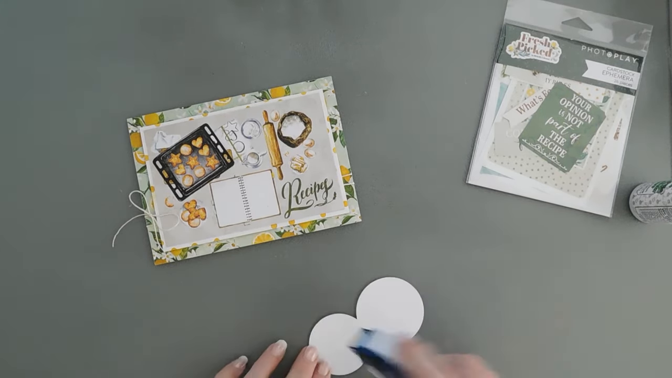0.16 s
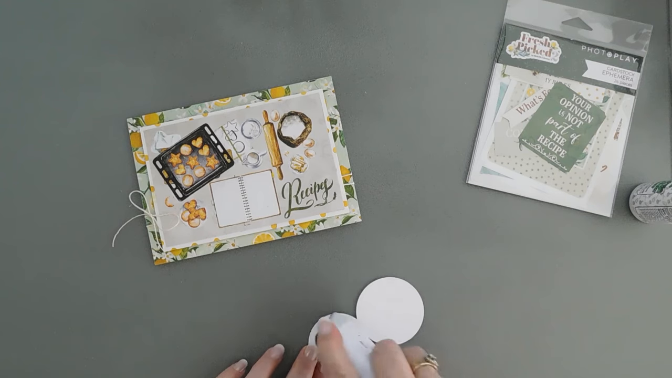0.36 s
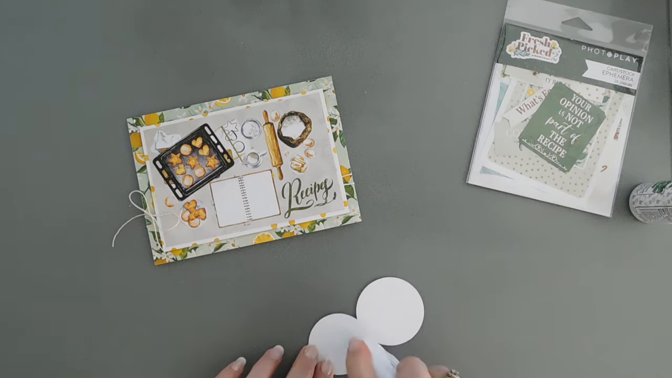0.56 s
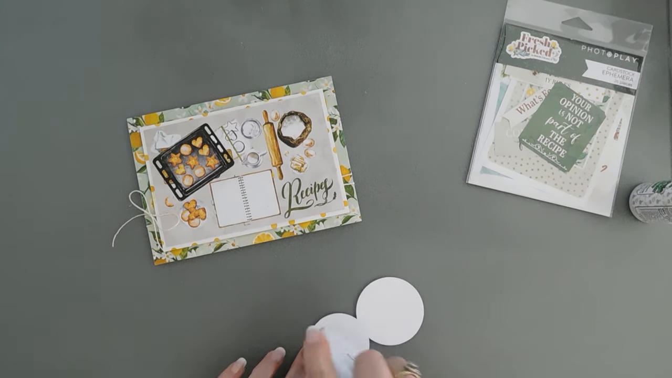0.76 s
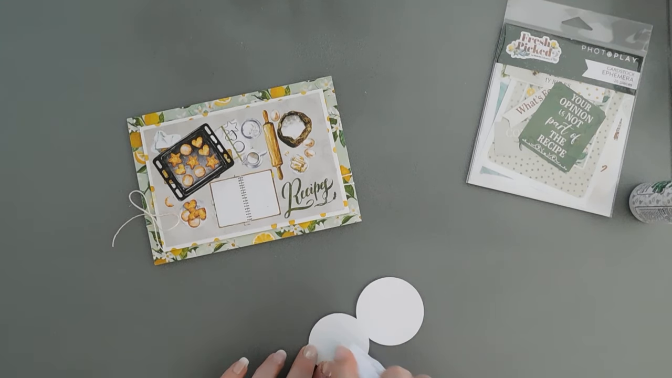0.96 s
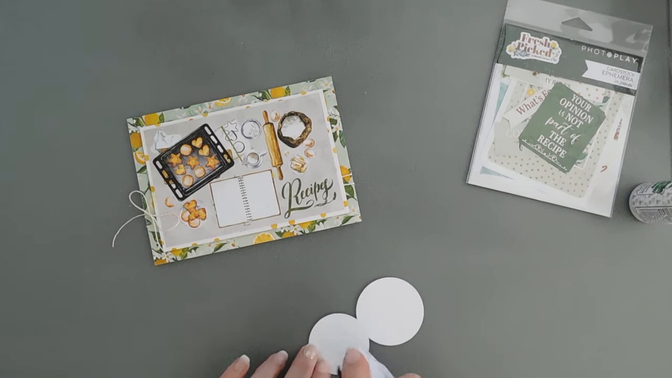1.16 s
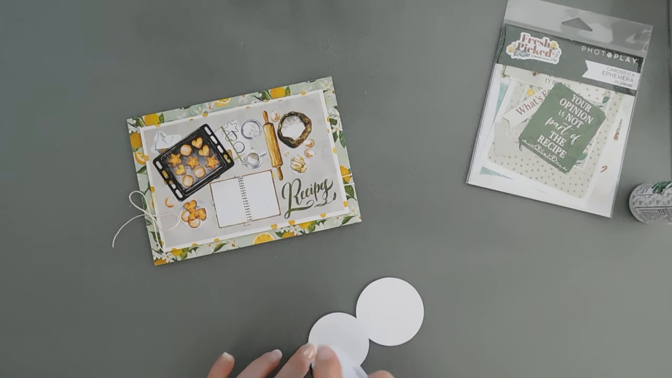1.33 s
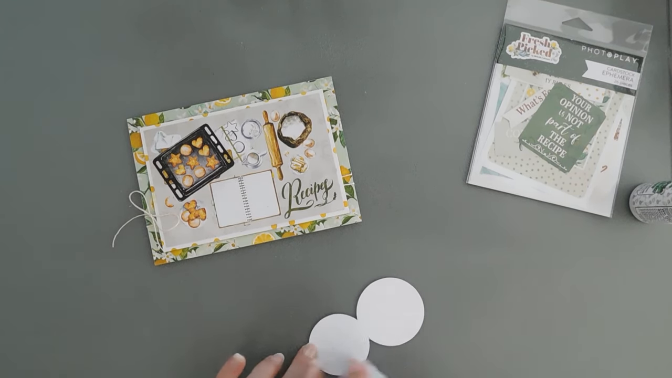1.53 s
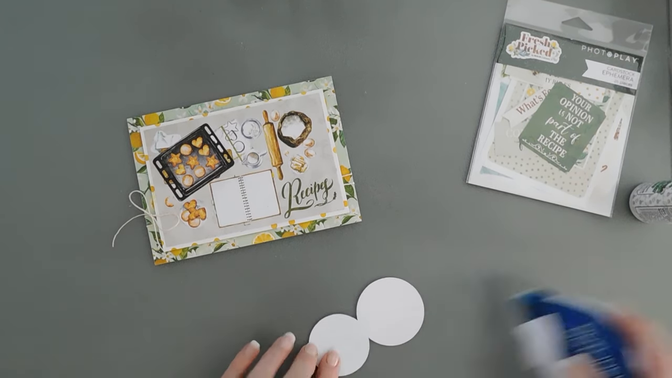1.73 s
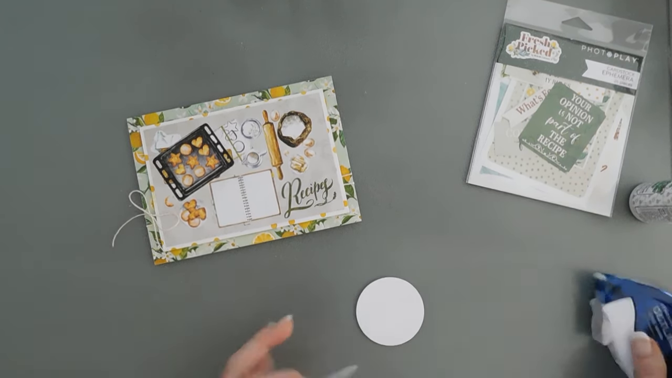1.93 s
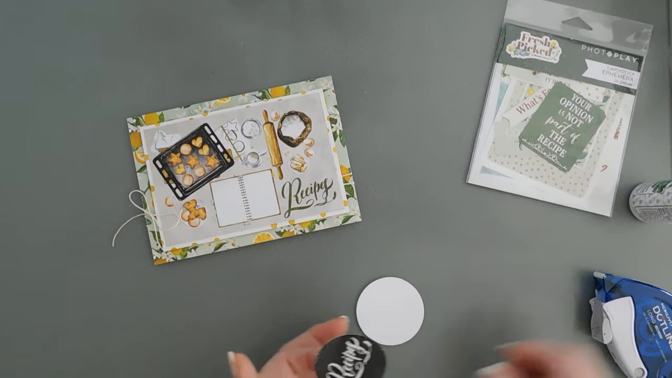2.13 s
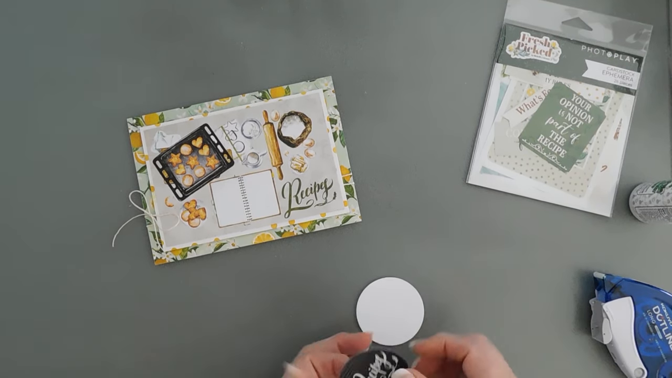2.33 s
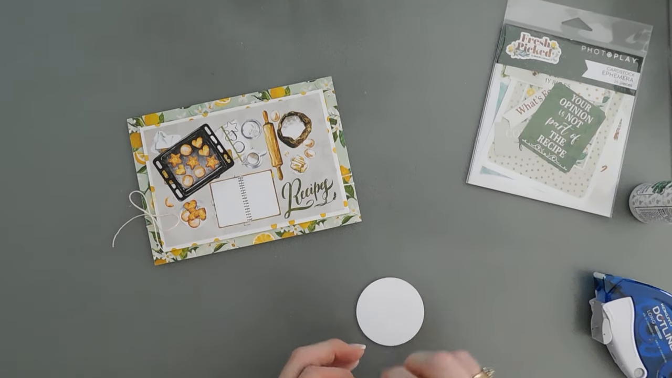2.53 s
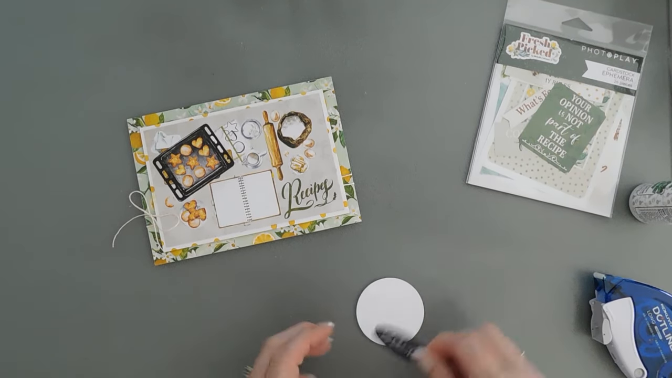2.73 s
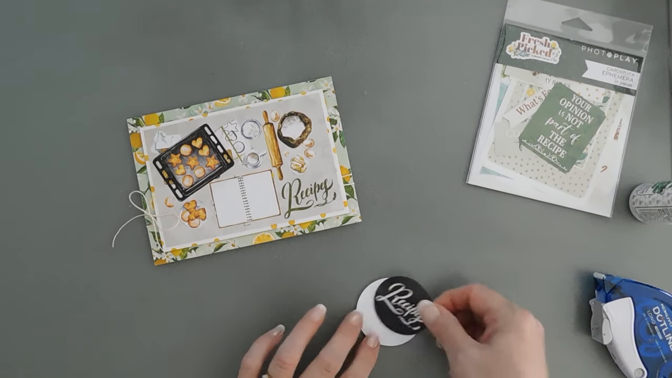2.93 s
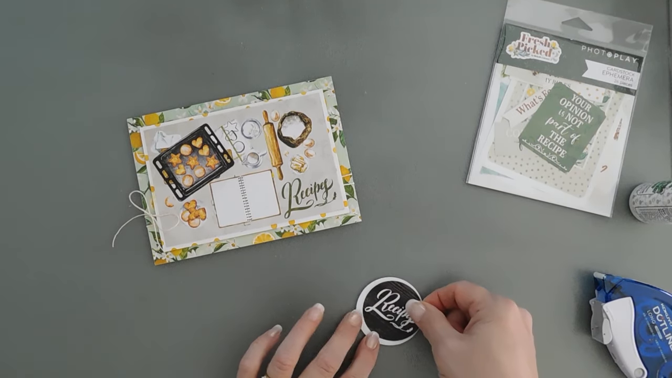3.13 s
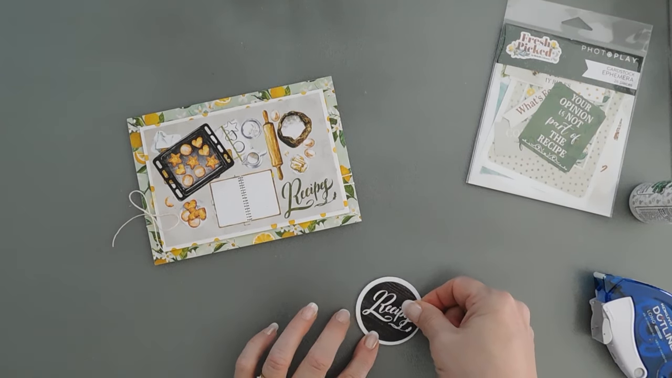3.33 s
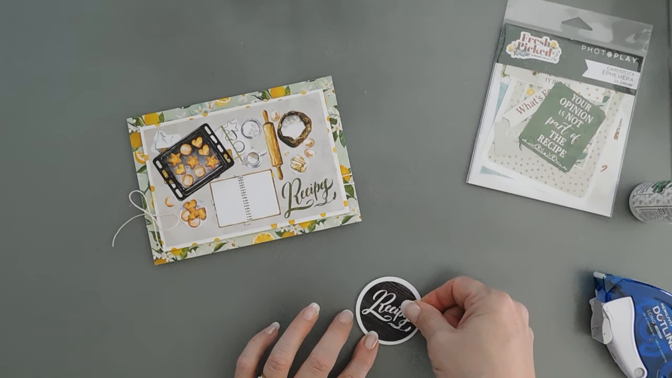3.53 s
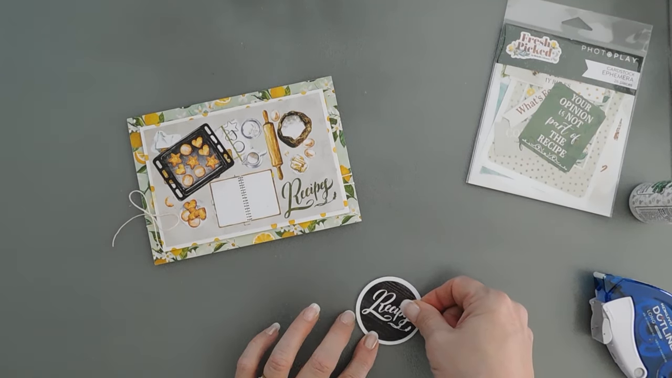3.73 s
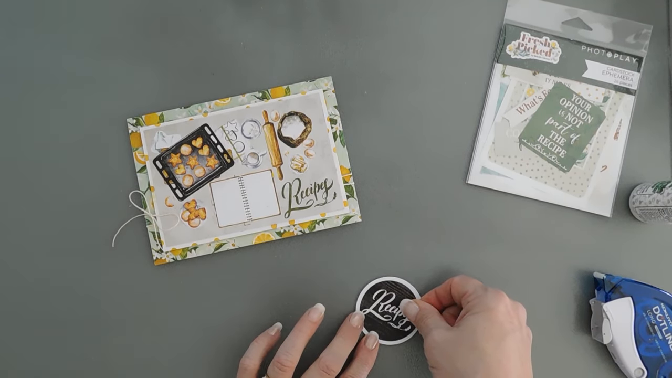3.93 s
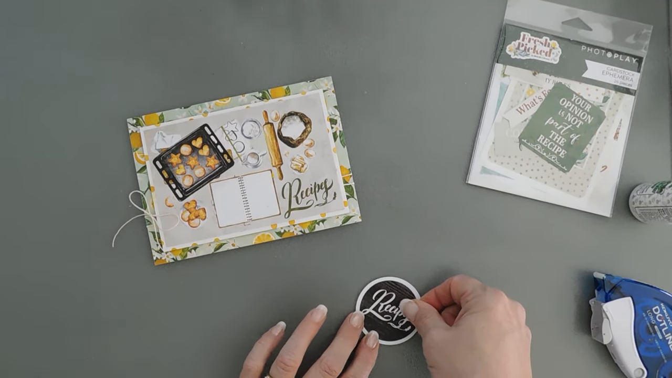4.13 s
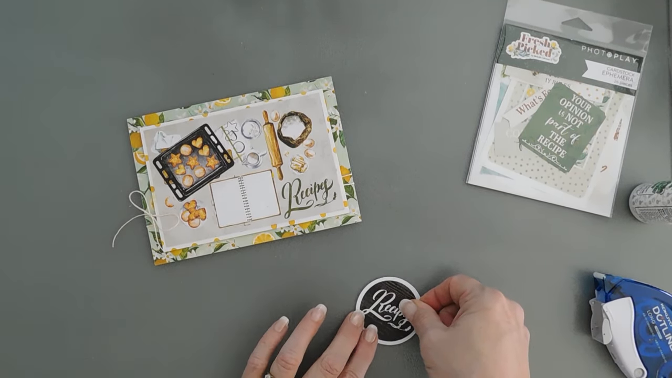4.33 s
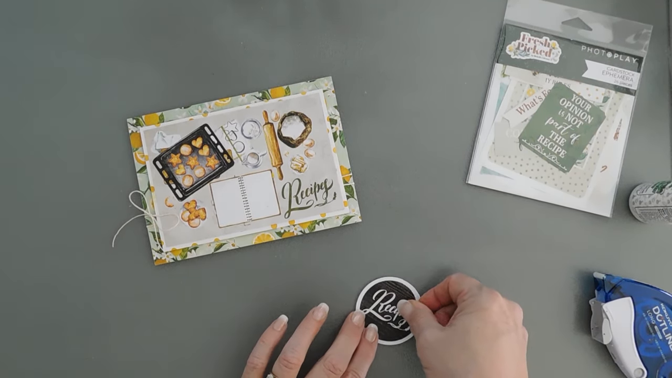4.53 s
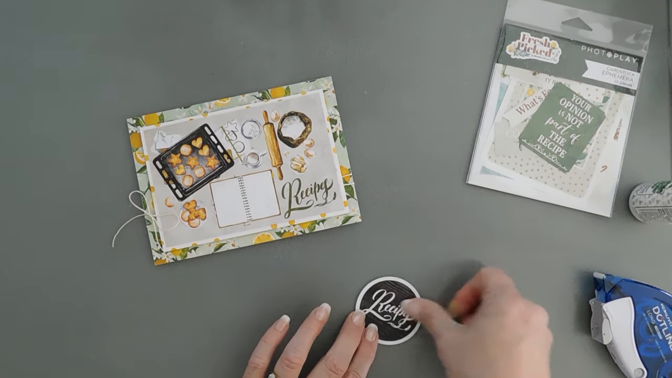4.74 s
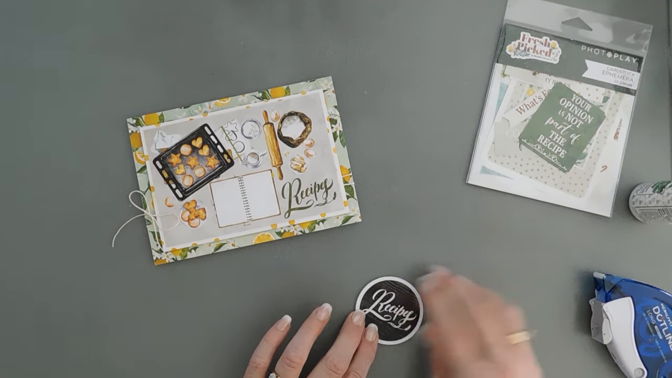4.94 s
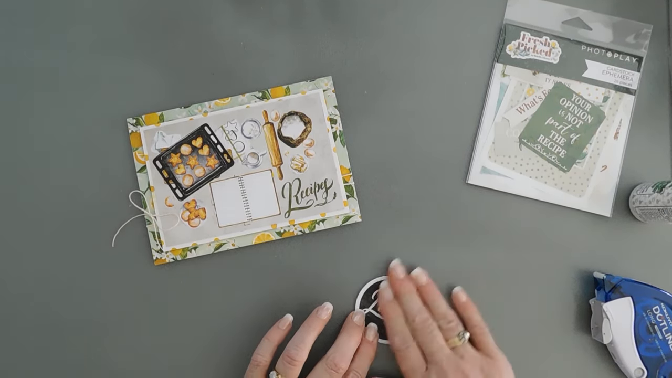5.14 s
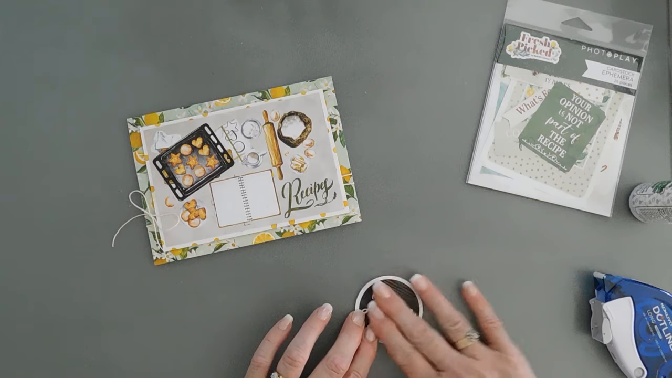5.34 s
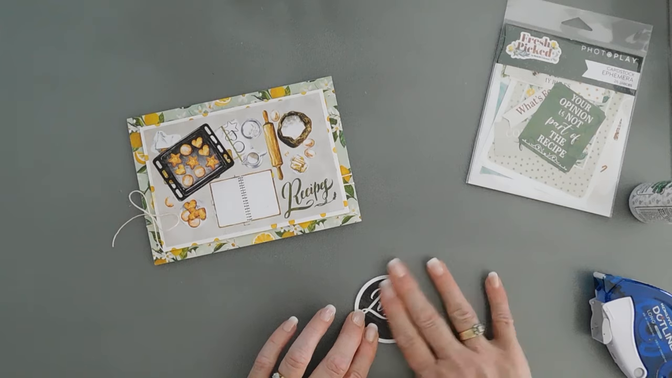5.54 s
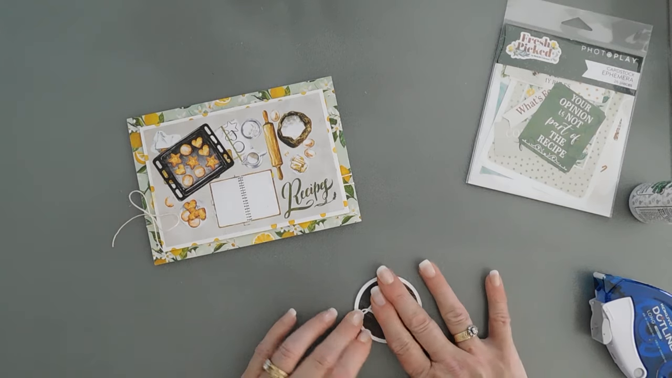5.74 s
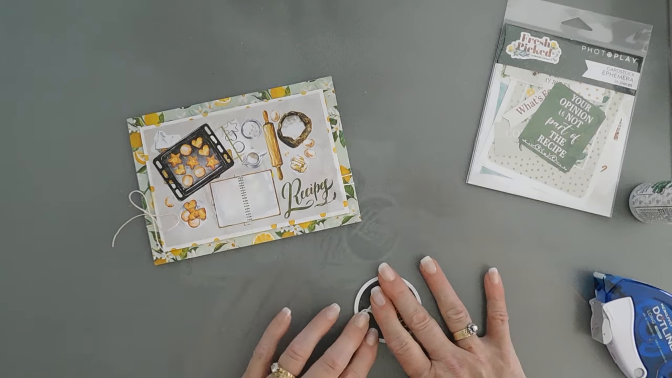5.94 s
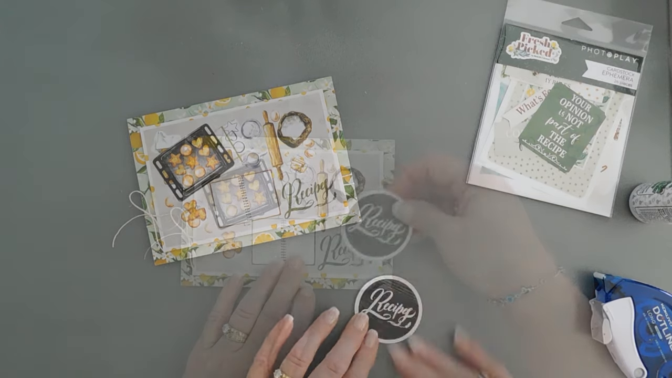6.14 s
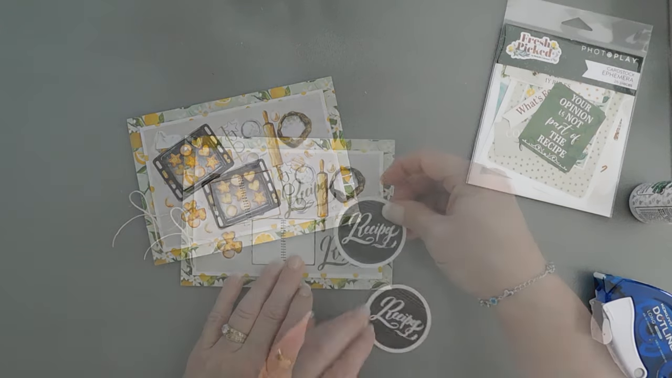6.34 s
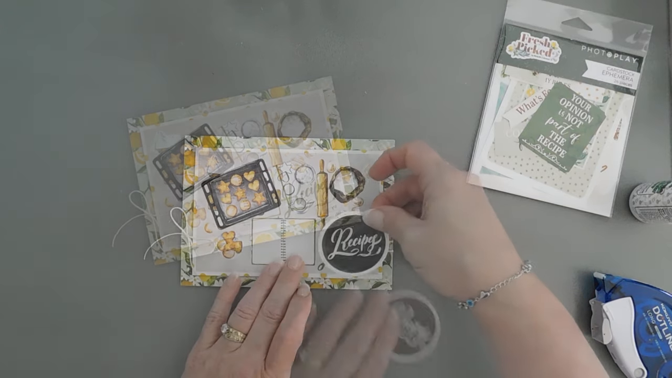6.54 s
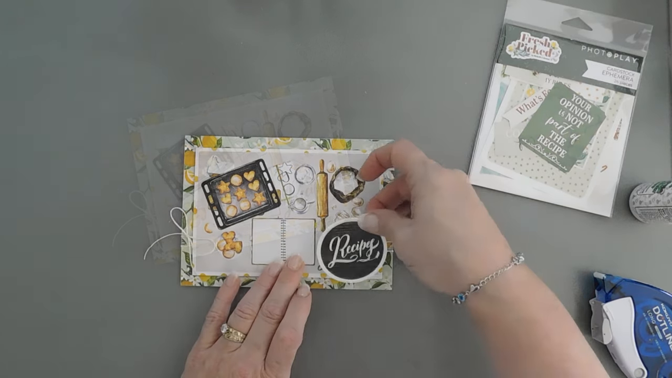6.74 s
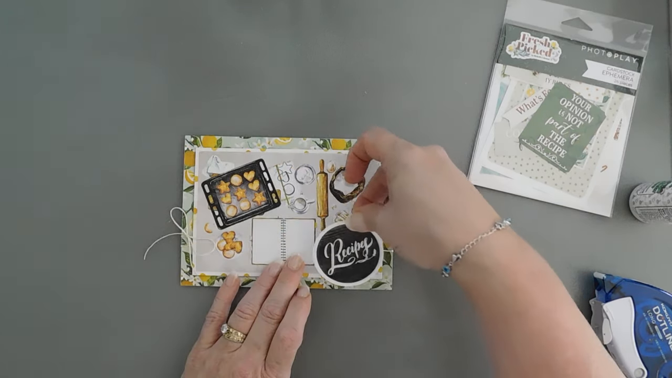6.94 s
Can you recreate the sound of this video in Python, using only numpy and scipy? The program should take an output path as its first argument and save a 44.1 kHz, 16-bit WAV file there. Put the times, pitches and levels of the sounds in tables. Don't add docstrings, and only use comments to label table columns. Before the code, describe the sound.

A plastic tape runner clacks and rattles through three short zipping pulls, drops noisily onto a table, then fingers softly tap and rub card.

```python
import sys
import numpy as np
from scipy import signal
from scipy.io import wavfile
from scipy.ndimage import uniform_filter1d

SR = 44100
rng = np.random.default_rng(int(sys.argv[2]) if len(sys.argv) > 2 else 0)


def unload_audio(sound):
    columns = np.transpose(np.atleast_2d(sound))
    steps = np.round(np.clip(columns, -1, 1) * 32767)
    wavfile.write(sys.argv[1], SR, steps.astype(np.int16))


def makeup_ratio(level_db):
    decades = np.asarray(level_db, float) / 20
    return 10 ** decades


N = 312777
STEP = 32

# (f/Hz, width/Hz, level/dB)
CARD_MODES = [(600, 200, -6), (850, 220, -5), (1150, 260, -3), (1500, 220, 0), (1950, 320, -2),
              (2450, 380, 0), (2900, 400, -2), (3400, 400, -1), (3850, 450, 0), (4350, 500, -1),
              (5500, 700, -4)]
# (f/Hz, density/dB)
TAPE_HISS = [(2350, -56.5), (4000, -0.5), (4520, -17.5), (4870, -14.5), (6550, -10), (14800, -10.5),
             (16000, -10)]


def runner():
    # (f/Hz, width/Hz, level/dB)
    case_modes = [(932, 68, -2), (1100, 80, -2), (1190, 110, 0.5), (1500, 230, -3.5), (1700, 140, -5.5),
                  (1960, 170, -3.5), (2420, 400, 4.5), (2660, 470, 5.5), (3119, 570, 8.5), (3450, 370, 6.5),
                  (4200, 560, 0.5), (6000, 570, 0.5)]
    # (t/s, peak/dB, centre f/Hz, crack re peak/dB, chatter/ms)
    landings = [(0.412, -21, 2030, -27.5, 3.6), (0.414, -31, 1030, -39, 4.9),
                (0.421, -23.5, 1100, -30, 1.7), (0.853, -22.5, 2540, -21.5, 5.6),
                (0.8605, -17.5, 1100, -17, 3.9), (0.8635, -16.5, 3450, -19.5, 3.5),
                (0.8695, -17.5, 2400, -23, 3.2), (0.878, -25, 2500, -29.5, 2.7),
                (0.878, -28.5, 1120, -21.5, 6.6), (1.46, -19.5, 1200, -20.5, 4.4),
                (1.461, -20.5, 2700, -14, 4.1), (1.469, -15, 2400, -35, 4.9),
                (1.468, -23.5, 1150, -30, 5.6), (1.479, -20.5, 2180, -28, 4.6)]
    # (t/s, peak/dB, centre f/Hz, crack re peak/dB,
    # chatter/ms)
    rattles = [(0.025, -41, 1700, -34, 3.2), (0.0815, -35.5, 1980, -30, 2.1),
               (0.127, -19.5, 2080, -18, 2.3), (0.197, -44, 3300, -13, 5.3), (0.236, -55, 789, -31, 2.5),
               (0.248, -38.5, 958, -39, 5.4), (0.2805, -41.5, 3450, -31, 0.92),
               (0.447, -54, 2500, -26, 3.2), (0.477, -31, 4400, -24.5, 2.4), (0.48, -23.5, 2100, -25, 16),
               (0.5045, -31, 2580, -14, 4), (0.5175, -19, 3270, -12.5, 8.1), (0.519, -22.5, 2250, -18.5, 9),
               (0.561, -35.5, 1800, -23, 3.0), (0.574, -24, 3020, -17, 1.3),
               (0.647, -26.5, 3260, -14.5, 3.1), (0.652, -21.5, 1700, -31.5, 2.7),
               (0.702, -44.5, 1650, -10, 3.8), (0.9095, -17, 2020, -19, 2.3), (0.911, -22, 2830, -16, 1.24),
               (0.925, -35, 3050, -26, 5), (0.933, -36, 2950, -28, 1.3), (0.951, -28.5, 3000, -21, 2.1),
               (1.13, -37, 3940, -10.5, 2), (1.173, -29.5, 2870, -43, 3.1),
               (1.506, -21.5, 1150, -30.5, 3.0), (1.503, -25, 3100, -26, 5),
               (1.526, -20.5, 3380, -15.5, 8.3), (1.691, -38.5, 3320, -8.5, 2.9),
               (1.695, -42, 2140, -8.5, 1.9),
               (0.068, -49, 2500, -4.5, 1.5),
        (1.149, -50, 3600, -4.5, 2.5),
        (1.807, -50.5, 1920, -6.5, 2.0),
    ]
    # (t/s, peak/dB, pitch f/Hz, swell/ms)
    tip_pings = [(0.4145, -26.5, 2060, 1.04), (0.4205, -30, 2380, 0.72), (0.434, -36, 2400, 1.1),
                 (0.448, -40, 2400, 0.9), (0.4768, -26.5, 2880, 0.48), (0.5047, -25.5, 1700, 0.29),
                 (0.8633, -15, 2400, 0.47), (0.8635, -17, 3450, 0.62), (0.8675, -14.5, 2770, 0.51),
                 (0.8748, -23, 2920, 0.53), (0.9108, -14.5, 3005, 0.71), (0.915, -14, 2920, 0.38),
                 (1.463, -13.5, 3000, 0.37), (1.4667, -20, 2890, 0.52), (1.4755, -19, 2630, 1),
                 (1.5078, -25, 1810, 0.45)]
    # (t/s, length/s, body rattle/dB, hiss/dB)
    pulls = [
        (0.508, 0.18, -35, -38),
        (0.905, 0.23, -39, -40),
        (1.495, 0.1, -40.5, -45),
    ]
    # (t/s, length/s, body rattle/dB, hiss/dB)
    shifts = [
        (0.05, 0.08, -55, -66),
        (0.18, 0.14, -59, -66.5),
        (0.815, 0.056, -53.5, -63.5),
        (1.43, 0.067, -51.5, -59.5),
        (1.135, 0.046, -53.5, -60),
        (1.27, 0.12, -68.5, -69.5),
        (1.76, 0.13, -71, -67.5),
        (1.85, 0.12, -46, -52.5),
    ]
    # (t/s, length/s, body rattle/dB, hiss/dB)
    buzzes = [
        (0.001, 0.055, -51.5, -69),
        (0.145, 0.03, -39, -69.5),
        (0.432, 0.12, -43, -60),
        (0.67, 0.064, -71, -74),
        (0.883, 0.025, -51, -46),
        (1.185, 0.14, -57, -68),
        (1.485, 0.018, -34, -67),
        (1.715, 0.029, -59, -76),
    ]
    hits = contacts(landings, -21, 1) + contacts(rattles, -58.5, 0.038)
    struck = knocks(hits, case_modes, reach_oct=0.64, lumps_db=2.0, click=1.0, ring_db=-4.0,
                    crack_db=23.0, thud_db=-6.5, thud_cut_hz=75, crack_hz=5566)
    moves = movements(pulls, rise=0.2, hold=0.3, rise_db=11, fall_db=18, hiss_fall_db=25)
    moves += movements(shifts, rise=0.5, hold=0.15, rise_db=7.3, fall_db=14, hiss_fall_db=12)
    moves += movements(buzzes, rise=0.011, hold=0.021, rise_db=0.1, fall_db=30, hiss_fall_db=18)
    strokes = sliding(moves, 1300, 1.5, case_modes, TAPE_HISS, per_s=1100, spread_db=3.5, widen=0.79,
                      likeness=[(5000, 0.64), (15000, 0.94)])
    return placed(struck + pings(tip_pings) + strokes, -3.5, late_samples=1)


def put_down():
    # (f/Hz, width/Hz, level/dB)
    modes = [(860, 150, -14), (1040, 215, 2.5), (1174, 212, -0.5), (1477, 150, -2.5), (1700, 250, -3),
             (2028, 190, -3), (2350, 140, -9), (2710, 316, -4), (3260, 85, -4), (4130, 380, -4.5),
             (5840, 490, -8.5)]
    # (t/s, peak/dB, centre f/Hz, crack re peak/dB, chatter/ms)
    bounces = [(1.886, -11, 2802, -20, 3.5), (1.888, -15.5, 1200, -32.5, 2.2),
               (1.891, -10.5, 1700, -24, 7.9), (1.8965, -13, 1194, -27, 1.5), (1.907, -16, 1500, -23.5, 13),
               (1.916, -16.5, 1203, -24, 5.5), (1.929, -15, 1093, -20.5, 1.6),
               (1.931, -20.5, 2970, -20, 1.9), (1.9755, -18.5, 3026, -21, 1.5),
               (1.98, -13, 1500, -31.5, 6.6), (1.986, -15, 2595, -22, 1.7), (1.99, -22, 1100, -34, 8.8),
               (2.003, -5, 2150, -15.5, 2.6), (2.0038, -12, 3250, -14.5, 1.6),
               (2.004, -8.5, 1050, -28, 1.2), (2.0095, -10, 2055, -19, 3.7), (2.0205, -9, 1500, -15.5, 6.6),
               (2.031, -13, 1894, -17, 7.8), (2.038, -13.5, 1421, -17.5, 4.6),
               (2.046, -16.5, 1500, -17, 9.9)]
    # (t/s, peak/dB, pitch f/Hz, swell/ms)
    drop_pings = [
        (1.8867, -10, 2294, 1.4),
        (1.887, -15.5, 1150, 2.8),
        (1.8965, -14.5, 2130, 0.9),
        (1.9755, -18.5, 1500, 2.9),
        (2.0032, -5, 2195, 0.59),
        (2.0033, -11.5, 3220, 0.7),
        (2.0088, -13, 1005, 0.84),
        (2.0125, -14.5, 2016, 1.7),
    ]
    # (t/s, length/s, body rattle/dB, hiss/dB)
    rocking = [
        (1.926, 0.056, -27.5, -45),
        (2.006, 0.21, -26, -29.5),
        (2.175, 0.32, -58, -75.5),
        (2.191, 0.33, -67.5, -93),
    ]
    blows = knocks(contacts(bounces, -24.5, 1), modes, reach_oct=0.56, lumps_db=4.0, click=1.09, ring_db=-3.0,
                   crack_db=26.0, thud_db=-11.5, thud_cut_hz=40, crack_hz=4300)
    moves = movements(rocking[:1], rise=0.21, hold=0.05, rise_db=6.7, fall_db=30, hiss_fall_db=7.7)
    moves += movements(rocking[1:2], rise=0.01, hold=0.026, rise_db=0.1, fall_db=42, hiss_fall_db=53)
    moves += movements(rocking[2:], rise=0.39, hold=0.223, rise_db=3.5, fall_db=4.9, hiss_fall_db=6.8)
    slides = sliding(moves, [1500, 1700, 1540, 4120], [3.5, 4.8, 0.31, 1.2], modes, TAPE_HISS, per_s=630,
                     spread_db=0.0, widen=1.5, likeness=[(5000, 0.3), (15000, 0.24)])
    return placed(blows + pings(drop_pings) + slides, -0.75, late_samples=2)


def card():
    # (t/s, peak/dB, centre f/Hz, crack re peak/dB)
    snap_rows = [(2.558, -58, 2140, -8.5), (3.0104, -51, 2870, -5.5), (3.0143, -51.5, 3640, 5),
                 (3.1224, -48, 2270, -7.5), (3.4314, -66.5, 2610, 0), (4.3829, -59, 1980, 1.5),
                 (5.0553, -44.5, 2110, -0.5), (5.7957, -46, 1900, -17.5), (5.8234, -48, 2540, -15),
                 (6.1682, -33, 2750, -14)]
    # (t/s, peak/dB, centre f/Hz, crack re peak/dB)
    nail_rap = [(5.9243, -26.5, 3870, -1)]
    # (t/s, peak/dB, centre f/Hz, crack re peak/dB)
    tap_rows = [(2.582, -45, 1950, -31), (4.5784, -58, 1190, 1.5), (4.9632, -30, 1284, -34),
                (4.9826, -41, 1350, -25), (4.985, -43, 2500, -12), (5.2944, -33, 2780, -27),
                (5.617, -27, 3940, -38), (6.1882, -51, 1760, -15), (6.2075, -44, 3870, -27),
                (6.212, -36, 3450, -27.5)]
    # (t/s, peak/dB, centre f/Hz, crack re peak/dB)
    flick_rows = [(2.6572, -33.5, 2070, -7), (2.662, -35, 825, -28), (2.7098, -25.5, 1700, -4.5),
                  (2.7102, -28.5, 3500, -13), (2.7105, -35.5, 634, -19), (2.714, -33.5, 2096, -12),
                  (4.6838, -28, 4325, -31), (4.6856, -27, 4450, -15.5), (4.686, -20.5, 3060, -12),
                  (4.6855, -56, 1240, -24), (4.6946, -28.5, 2080, -1)]
    # (t/s, peak/dB, pitch f/Hz, swell/ms)
    edge_pings = [
        (2.6575, -37.5, 3920, 0.51),
        (2.6575, -33, 2130, 0.48),
        (2.7102, -30, 2030, 0.6),
        (2.7102, -34, 4200, 0.85),
        (2.7104, -43, 5770, 0.7),
        (2.714, -34, 2320, 0.64),
        (4.6838, -27.5, 4300, 1.1),
        (5.296, -55, 2750, 1.7),
        (5.303, -50, 2550, 1.5),
    ]
    # (t/s, length/s, body rattle/dB, hiss/dB, centre f/Hz)
    rub_rows = [(2.658, 0.098, -54.5, -63, 2020), (2.928, 0.1, -65, -73, 2100),
                (3.012, 0.067, -50.5, -53, 3830), (3.255, 0.215, -73, -77.5, 5470),
                (4.526, .07, -73, -76, 3000), (4.649, 0.061, -68, -60.5, 3070),
                (4.777, 0.058, -72, -65, 3220), (4.943, 0.056, -50, -62, 1250),
                (4.997, 0.063, -58, -72, 1300), (5.129, 0.14, -55.5, -59, 1610),
                (5.277, 0.074, -57, -53.5, 2660), (5.348, 0.21, -67, -57.5, 2980),
                (5.55, 0.13, -65, -57.5, 3600), (5.644, 0.28, -69, -73.5, 2900),
                (5.886, 0.075, -59, -60.5, 2950), (6.031, 0.31, -58.5, -56, 1500),
                (6.143, 0.047, -75, -56, 1500), (6.16, 0.047, -52, -81, 1300)]
    # (t/s, length/s, body rattle/dB, hiss/dB, centre f/Hz)
    trembles = [
        (2.583, 0.029, -52.5, -62, 2480),
        (2.713, 0.049, -62, -60, 2000),
        (2.715, 0.18, -58, -78, 4200),
        (4.681, 0.1, -49, -63, 4200),
        (5.053, 0.055, -51.5, -54, 1610),
        (5.925, 0.03, -38.5, -56, 1140),
        (6.25, 0.075, -34.5, -45, 2420),
        (6.286, 0.11, -38.5, -59, 1700),
    ]
    # (f/Hz, density/dB)
    skin_hiss = [(2650, -15), (4500, -9), (6520, -12), (7450, -8), (12200, -8), (14700, -10.5),
                 (16000, -10)]
    sharp = contacts(snap_rows, -54, 0.19, chatter_ms=0.4) + contacts(nail_rap, -19, 0.91, chatter_ms=0.4)
    snaps = knocks(sharp, CARD_MODES, reach_oct=1.24, lumps_db=1.5, click=1.0, ring_db=-13, crack_db=14.0,
                   thud_db=-12.5, thud_cut_hz=14.0, crack_hz=4300)
    taps = knocks(contacts(tap_rows, -53, 0.22, chatter_ms=3.2), CARD_MODES, reach_oct=0.21, lumps_db=0,
                  click=0.12, ring_db=-2.0, crack_db=20, thud_db=-12.0, thud_cut_hz=79, crack_hz=4300)
    flicks = knocks(contacts(flick_rows, -54, 0.33, chatter_ms=1.0), CARD_MODES, reach_oct=0.15, lumps_db=0,
                    click=0.51, ring_db=-1.0, crack_db=12.0, thud_db=-8.5, thud_cut_hz=83.0, crack_hz=5000)
    moves = movements(rub_rows, rise=0.295, hold=0.36, rise_db=8.8, fall_db=14.4, hiss_fall_db=34)
    moves += movements(trembles, rise=0.011, hold=0.021, rise_db=0.1, fall_db=30, hiss_fall_db=18)
    centres_hz = [row[-1] for row in rub_rows + trembles]
    rubs = sliding(moves, centres_hz, 1.0, CARD_MODES, skin_hiss, per_s=3800, spread_db=1.5, widen=0.94,
                   likeness=[(5000, 0.42), (15000, 0.68)])
    return placed(snaps + flicks + pings(edge_pings) + taps + rubs + trinket(), -4.5, late_samples=0)


def trinket():
    # (f/Hz, width/Hz, level/dB)
    metal_modes = [(1430, 200, 4), (1950, 350, -4.5), (2400, 300, -2), (3350, 190, -3), (4080, 320, 1),
                   (5480, 120, -8), (7880, 420, -2), (9380, 250, -2), (11220, 260, 0), (13100, 230, -3),
                   (13900, 180, -1), (15300, 200, -1)]
    # (t/s, peak/dB, centre f/Hz, crack re peak/dB, chatter/ms)
    graze_rows = [(6.2505, -32.5, 6900, -14, 2.0), (6.2525, -26.5, 4040, -14, 6.8),
                  (6.2545, -25, 9000, -1, 3.2), (6.256, -27.5, 2560, -15, 2.7),
                  (6.259, -45.5, 7000, -14, 2.1), (6.2865, -41, 5000, 0, 3.0), (6.291, -24, 1500, -6, 2.5),
                  (6.2915, -31, 2400, -10, 3.0), (6.292, -43, 5000, 2, 3.3), (6.305, -49, 2000, -18, 3.5),
                  (6.316, -52, 2000, -20, 3.0)]
    # (t/s, peak/dB, centre f/Hz, crack re peak/dB, chatter/ms)
    thread_rows = [(6.1555, -52, 3170, 14.5, 0.6), (6.164, -54, 3500, 6, 0.5), (6.1685, -55, 3000, 18, 0.6),
                   (6.1868, -58.5, 3000, 16.5, 0.7), (6.19, -56, 3000, 18, 0.6),
                   (6.209, -60, 3000, 12, 0.8), (6.2125, -55, 3500, 9, 1.0)]
    # (t/s, peak/dB, pitch f/Hz, swell/ms)
    thread_pings = [(6.1553, -36, 12300, 0.3), (6.1685, -32, 11400, 0.3), (6.1687, -37, 14000, 0.3),
                    (6.1865, -39, 14600, 0.4), (6.1898, -39, 14300, 0.3)]
    grazes = knocks(contacts(graze_rows, -53, 0.22), metal_modes, reach_oct=0.9, lumps_db=0, click=0.12,
                    ring_db=0.5, crack_db=14.5, thud_db=-11.0, thud_cut_hz=69, crack_hz=5000)
    threads = knocks(contacts(thread_rows, -54, 0.19), CARD_MODES, reach_oct=0.6, lumps_db=1.5, click=0.3,
                     ring_db=-2.0, crack_db=10.5, thud_db=-19.0, thud_cut_hz=79, crack_hz=9270)
    return grazes + threads + pings(thread_pings)


def contacts(rows, full_scale_thud_db, slope, chatter_ms=None):
    return [(s, peak_db, hz, crack_db, full_scale_thud_db + (slope - 1) * peak_db, chatter_ms or own[0])
            for s, peak_db, hz, crack_db, *own in rows]


def knocks(events, modes, reach_oct, lumps_db, click, ring_db, crack_db, thud_db, thud_cut_hz, crack_hz):
    # (f/Hz, width/Hz, level/dB)
    table_modes = [(60, 27, -5.5), (112.9, 30, -8.5), (179, 50, -1.5), (256, 84, 8.5), (332, 65, 9.5),
                   (470, 160, -10)]
    ms = np.arange(2048) / SR * 1000
    starts_s = [event[0] for event in events]
    first = round(min(starts_s) * SR)
    span = min(round(max(starts_s) * SR) + SR // 2, N) - first
    mode_hz, mode_db = np.array(modes)[:, 0], np.array(modes)[:, 2]
    probe = np.exp(-2j * np.pi * np.outer(mode_hz, ms) / 1000)
    forces, cracks = np.zeros((len(modes), span)), np.zeros((2, span))
    thuds = np.zeros((len(table_modes), span))
    for s, peak_db, centre_hz, crack_re_db, thud_re_db, chatter_ms in events:
        at = round(s * SR) - first
        during = slice(at, at + len(ms))
        mode_luck, table_luck = rng.standard_normal(len(modes)), rng.standard_normal(len(table_modes))
        rough, left, right, uneven = rng.standard_normal((4, len(ms)))
        lumps = makeup_ratio(lumps_db * rms_one(uniform_filter1d(uneven, size=30)))
        shape = lumps * np.exp(-ms / chatter_ms) * np.minimum(ms / (0.2 * chatter_ms) + 0.25, 1)
        shape = shape / np.sqrt(np.sum(shape ** 2))
        blow = shape * rough
        blow[0] += click / chatter_ms
        far_db = nearness_db(mode_hz, centre_hz, reach_oct)
        strength = makeup_ratio(peak_db + ring_db + mode_db + far_db + 1.2 * mode_luck)
        strength *= np.hypot(1, click / chatter_ms) / np.maximum(np.abs(probe @ blow), 0.4)
        forces[:, during] += strength[:, None] * blow
        cracks[:, during] += makeup_ratio(peak_db + crack_re_db + crack_db) * (blow + shape * np.array([left, right]))
        thuds[:, at] += makeup_ratio(peak_db + thud_re_db + thud_db + 2.0 * table_luck)
    body = 0
    for k, (force, (hz, width_hz, _)) in enumerate(zip(forces, modes)):
        body = body + (-1) ** k * ring(force, hz, width_hz)
    table = sum(makeup_ratio(db) * ring(thud, hz, width_hz) for thud, (hz, width_hz, db) in zip(thuds, table_modes))
    cracks = passed(passed(cracks, crack_hz, "high"), 0.45 * SR, "low") * makeup_ratio([[1.3], [-1.3]])
    out = passed(body, 0.6 * mode_hz.min(), "high") + cracks + passed(table, thud_cut_hz, "high")
    return np.pad(out, [(0, 0), (first, N - first - span)])


def pings(rows):
    out, ms = np.zeros(N), np.arange(1024) / SR * 1000
    for s, peak_db, hz, swell_ms in rows:
        age = ms / swell_ms
        tone = age * np.exp(1 - age) * np.sin(2 * np.pi * hz * ms / 1000)
        out[round(s * SR):][:len(ms)] += makeup_ratio(peak_db) * tone
    return out


def movements(rows, rise, hold, rise_db, fall_db, hiss_fall_db):
    return [[(s, body_db - rise_db, hiss_db - rise_db),
             (s + rise * length_s, body_db, hiss_db),
             (s + (rise + hold) * length_s, body_db, hiss_db),
             (s + length_s, body_db - fall_db, hiss_db - hiss_fall_db)]
            for s, length_s, body_db, hiss_db, *_ in rows]


def sliding(spans, centres_hz, reach_oct, modes, hiss, per_s, spread_db, widen, likeness):
    gains = gains_in_time(spans)
    slips = grains(per_s, spread_db) * drift(60, 1.5)
    hz, width_hz, level_db = np.transpose(modes)
    shares = makeup_ratio(level_db + nearness_db(hz, np.reshape(centres_hz, (-1, 1)), np.reshape(reach_oct, (-1, 1))))
    shares = shares / np.sqrt(np.sum(shares ** 2, axis=1, keepdims=True)) * np.ones((len(spans), 1))
    body = 0
    for k, gain in enumerate(shares.T @ gains[:, 0]):
        tone = rms_one(ring(slips, hz[k], widen * width_hz[k]))
        body = body + (-1) ** k * drift(15, 1.5) * stretched(gain) * tone
    fine = 0.31 * slips + rng.standard_normal((2, 2, N))
    air = banded(fine, hiss, likeness, patchy_db=2.0) * makeup_ratio([[1.1], [-1.1]])
    return passed(body, 430, "high") + stretched(gains[:, 1].sum(axis=0)) * air


def grains(per_s, spread_db):
    sizes = makeup_ratio(spread_db * np.minimum(rng.exponential(1, N), 5)) * rng.choice([-1, 1], N)
    return rms_one(sizes * (rng.random(N) < per_s / SR))


def gains_in_time(spans):
    t, out = np.arange(0, N + STEP, STEP) / SR, []
    for rows in spans:
        s, *columns = np.transpose(rows)
        fade_in = (t - s[0]) / np.clip(s[1] - s[0], 0.002, 0.01)
        fade_out = (s[-1] - t) / 0.01
        fade = np.clip(np.minimum(fade_in, fade_out) + 1, 0, 1)
        out.append(fade * makeup_ratio([np.interp(t, s, column) for column in columns]))
    return np.array(out)


def ring(force, hz, width_hz):
    r, w = np.exp(-np.pi * width_hz / SR), 2 * np.pi * hz / SR
    return signal.lfilter([0, np.sin(w)], [1, -2 * r * np.cos(w), r * r], force + 1e-18)


def nearness_db(hz, centre_hz, reach_oct):
    return -np.minimum(6 * (np.log2(hz / centre_hz) / reach_oct) ** 2, 27.0)


def banded(source, spectrum, likeness, patchy_db):
    low_hz, high_hz = spectrum[0][0], spectrum[-1][0]
    edges = np.geomspace(low_hz, high_hz, int(3 * np.log2(high_hz / low_hz)) + 1)
    out = 0
    for k, band in enumerate(zip(edges, edges[1:])):
        sos = signal.butter(2, band, "band", fs=SR, output="sos")
        mid, side = signal.sosfilt(sos, source[k % 2])
        hz = np.sqrt(band[0] * band[1])
        alike = at_hz(likeness, hz)
        gain = makeup_ratio(at_hz(spectrum, hz)) * drift(21, patchy_db)
        out = out + gain * (np.sqrt(1 + alike) * mid + np.sqrt(1 - alike) * side * [[1], [-1]])
    return rms_one(out)


def at_hz(points, hz):
    table_hz, values = np.transpose(points)
    return np.interp(np.log(hz), np.log(table_hz), values)


def drift(rate_hz, spread_db):
    r = np.exp(-2 * np.pi * rate_hz * STEP / SR)
    slow = signal.lfilter([1], [1, -2 * r, r * r], rng.standard_normal(N // STEP + 2002))[2000:]
    return stretched(makeup_ratio(spread_db * rms_one(slow)))


def stretched(coarse):
    return np.interp(np.arange(N) / STEP, np.arange(len(coarse)), coarse)


def rms_one(x):
    return x / np.sqrt(np.mean(x ** 2) + 1e-20)


def passed(x, hz, kind):
    return signal.sosfilt(signal.butter(4, hz, kind, fs=SR, output="sos"), x + 1e-18)


def placed(x, pan_db, late_samples):
    return np.array([x[0], np.roll(x[1], late_samples)]) * makeup_ratio([[pan_db / 2], [-pan_db / 2]])


def room(x):
    t60_s, alike_below_hz = 0.25, 800
    t = np.arange(SR // 2) / SR
    own, shared = rng.standard_normal((2, len(t))), rng.standard_normal(len(t))
    noise = passed(shared, alike_below_hz, "low") + passed(own, alike_below_hz, "high")
    top = passed(noise, 0.45 * SR, "high")
    onset = np.clip(t / 0.0024 - 0.25, 0, 1)
    echoes = (noise - top + top * makeup_ratio(-120.0 * t)) * makeup_ratio(-60 * t / t60_s) * onset
    echoes = echoes / np.sqrt(np.sum(echoes ** 2, axis=1, keepdims=True))
    wet = signal.fftconvolve(x.mean(axis=0, keepdims=True), echoes, axes=1)[:, :N]
    return wet * makeup_ratio([[-1.1], [1.1]])


def hum():
    # (f/Hz, density/dB)
    air_spectrum = [(20, 6.5), (60, 2.5), (90, -6), (120, -2.5), (250, -0.5), (400, -3), (640, -1),
                    (1000, -3.5), (1400, -1), (2500, -6), (4000, -16.5), (6300, -22), (13000, -23.5),
                    (16000, -26)]
    # (f/Hz, correlation/1)
    air_likeness = [(60, 0.72), (180, 0.37), (550, 0.52), (1650, -0.36), (4970, 0.15), (15000, -0.15)]
    # (f/Hz, width/Hz, level/dB)
    drones = [(347.8, 21, -72.5), (1190, 30, -74), (1500, 37, -78)]
    air = makeup_ratio(-59.5) * banded(rng.standard_normal((2, 2, N)), air_spectrum, air_likeness, patchy_db=1.0)
    drone = sum(makeup_ratio(db) * rms_one(ring(rng.standard_normal(N), hz, width_hz)) for hz, width_hz, db in drones)
    return (air + drone) * makeup_ratio([[-1.2], [1.2]])


def scene():
    held, dropped, fingers = runner(), put_down(), card()
    sent = makeup_ratio(-0.5) * (held + dropped) + makeup_ratio(-3.0) * fingers + makeup_ratio(-13.0) * passed(fingers, 4000, "low")
    return held + dropped + fingers + makeup_ratio(-4) * room(sent) + hum()


def roll_off(x):
    return signal.sosfilt(signal.butter(12, 16680, fs=SR, output="sos"), x)


def record(dry):
    top_cut = signal.cheby2(12, 60, 16750, fs=SR, output="sos")
    mix = signal.sosfilt(top_cut, np.clip(dry, -0.97, 0.97))
    return roll_off(mix)


dry = scene()
out = record(dry)
unload_audio(out)
```